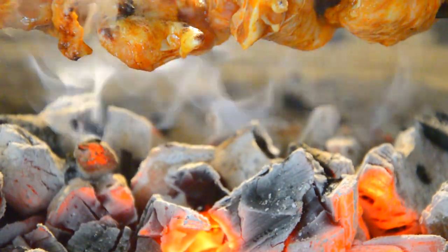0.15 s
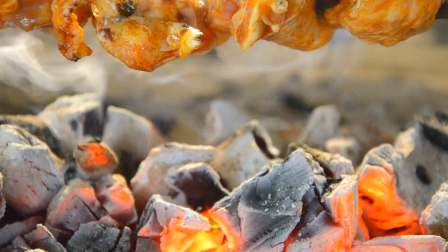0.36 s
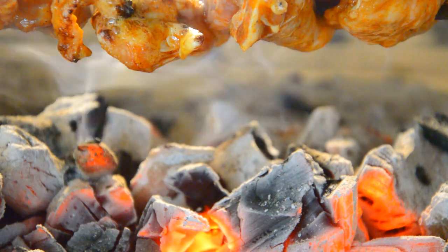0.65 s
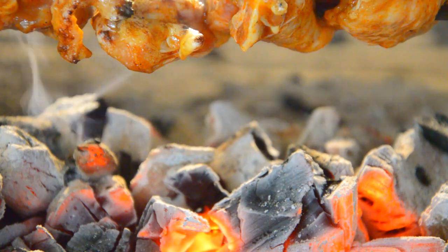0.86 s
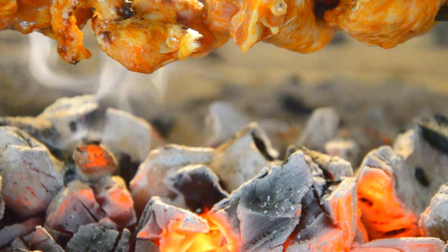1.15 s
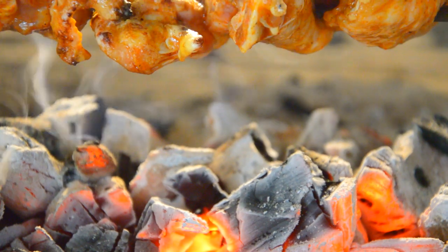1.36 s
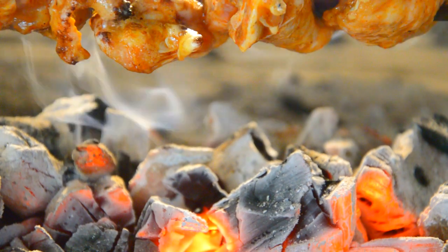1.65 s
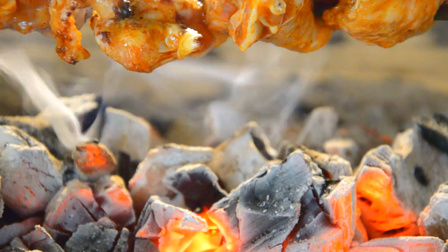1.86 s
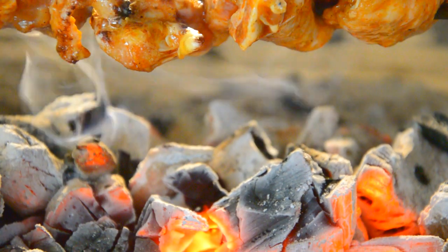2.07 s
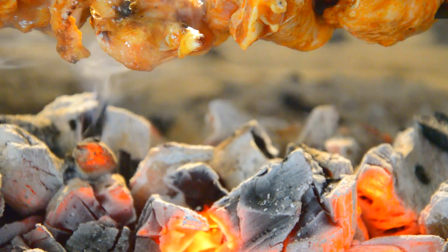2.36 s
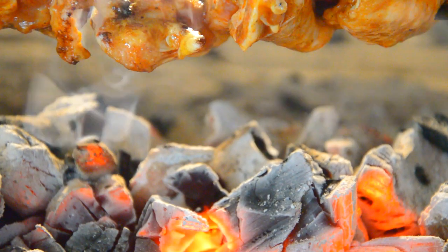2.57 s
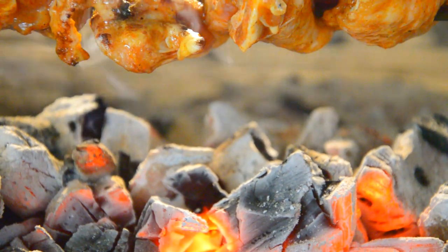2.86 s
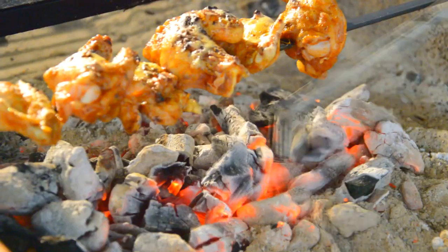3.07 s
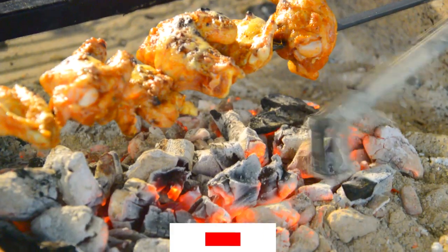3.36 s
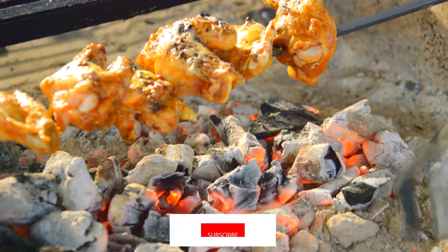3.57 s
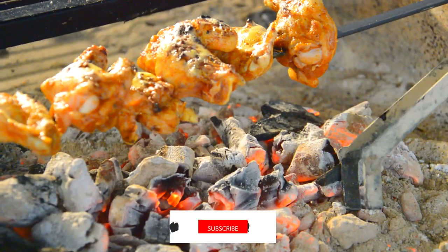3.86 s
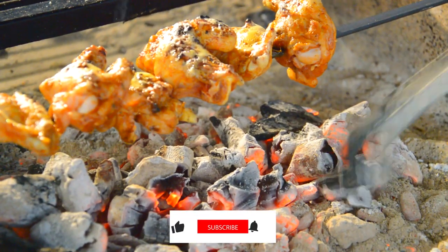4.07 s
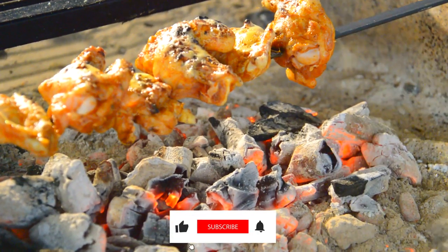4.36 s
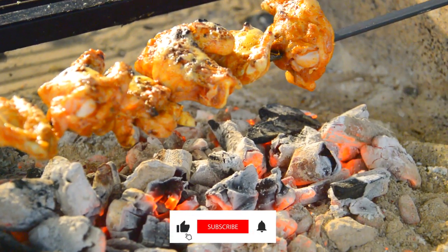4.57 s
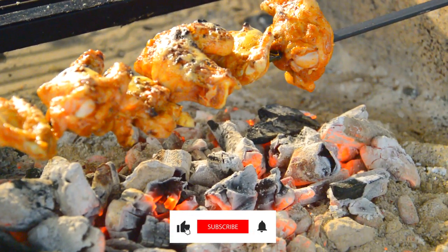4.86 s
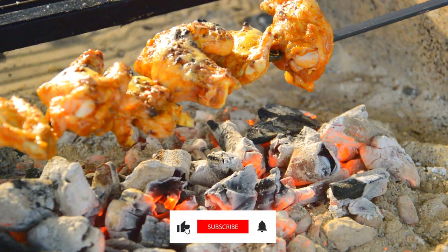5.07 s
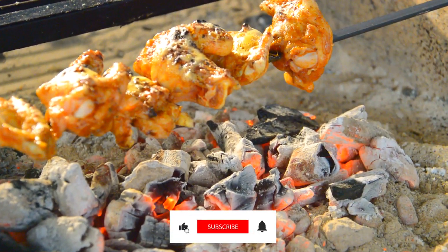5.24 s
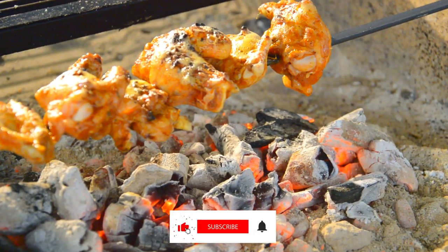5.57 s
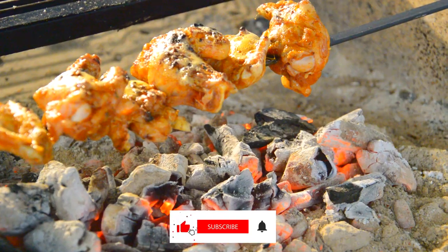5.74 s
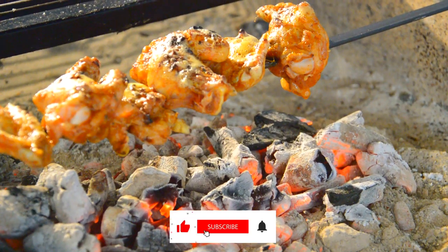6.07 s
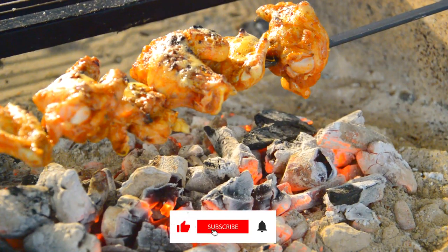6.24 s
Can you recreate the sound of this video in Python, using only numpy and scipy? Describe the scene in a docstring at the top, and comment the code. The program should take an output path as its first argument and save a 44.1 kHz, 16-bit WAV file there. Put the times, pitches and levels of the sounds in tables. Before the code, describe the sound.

Very close to an open charcoal pit outdoors, dripping fat fizzes and hisses under constant sharp spits, hollow pops and a bubbling gurgle. Soft thumps come early on. At about five seconds the steady sizzle suddenly vanishes, leaving bare snaps, then fades back in drier and more crackly, with wind rumbling on the microphone.

```python
"""At an open pit, fat and juice drip onto glowing charcoal and sizzle, close to the microphone.
Clicks with noise tails, rung at set pitches, make the sharp spits, hollow pops, thumps, dry ticks and gurgle.
The fizz is a dense crowd of such clicks and the steam is coloured noise; two whumps are falling tones.
Faint rumble is low noise. Near the end the steady sounds drop out while spits and pops go on.
The steady sounds then fade back in, now with wind rumbling on the microphone."""
import sys
import numpy as np
from scipy import signal
from scipy.fft import rfft, irfft, next_fast_len
from scipy.io import wavfile

SR = 44100
rng = np.random.default_rng(int(sys.argv[2]) if len(sys.argv) > 2 else 0)


def bounce(signal):
    """Save signal as a 16-bit WAV file at the path given by the first command-line argument."""
    frames = np.transpose(np.atleast_2d(signal))
    limited = np.clip(frames, -1, 1)
    pcm = np.round(limited * 32767).astype(np.int16)
    wavfile.write(sys.argv[1], SR, pcm)


N = 282240   # samples, 6.4 seconds

# All levels below are before the fade of the steady sounds and before the rounding of loud peaks.
# The changing sizzle up to the cut. Each row: start in seconds, fizz level in dB, low gurgle level in dB,
# low gurgle pitch in Hz, high gurgle level in dB.
SIZZLE_BEFORE = [(0.0, -32, -42.5, 2060, -43), (0.25, -30, -40, 1650, -42.5),
                 (0.49, -31, -40.5, 2050, -35.5), (1.21, -31.5, -37.5, 2230, -44),
                 (1.51, -30, -41.5, 1800, -46), (1.66, -29, -37.5, 2190, -34),
                 (1.92, -29.5, -41.5, 1450, -36), (2.39, -35, -45.5, 2370, -41.5),
                 (2.62, -33.5, -37.5, 2250, -41), (2.74, -31.5, -37, 2080, -46),
                 (2.85, -33.5, -44, 1400, -48), (2.96, -31.5, -44, 1400, -47),
                 (3.05, -33, -38.5, 1420, -37), (3.16, -30, -47, 1620, -40), (3.31, -31, -42, 1840, -36.5),
                 (3.45, -31, -47, 2040, -45), (3.57, -31.5, -42, 2190, -45),
                 (3.8, -30.5, -42.5, 2170, -44.5), (3.98, -32, -47.5, 2270, -51),
                 (4.17, -32, -42.5, 1680, -45.5), (4.39, -31.5, -44.5, 1430, -41),
                 (4.45, -29.5, -40.5, 1930, -42.5), (4.82, -32.5, -52, 2180, -48),
                 (5.02, -32.5, -53, 2300, -50)]
# The steady sizzle after the cut. In order: fizz level in dB, low gurgle level in dB,
# low gurgle pitch in Hz, high gurgle level in dB.
SIZZLE_LATER = (-37.5, -43.5, 1917, -44)
# Loud spits of bursting bubbles. Each row: start in seconds, peak level in dB, centre pitch in Hz,
# hissing tail in dB against the crack.
SPIT_EVENTS = [(0.1281, -14.0, 13500.0, -16.0), (0.1799, -9.5, 10100.0, 1.0),
               (0.2117, -10.0, 6200.0, -17.0), (0.2874, -17.0, 5200, -11), (0.382, -13.0, 7300.0, -15.0),
               (0.4723, -10.0, 14500.0, -25.0), (0.4819, -10.5, 10600.0, -19.0),
               (0.5292, -6.0, 9100.0, -18.0), (0.5411, -3.5, 9400.0, -25.0),
               (0.5776, -11.0, 12600.0, -16.0), (0.6759, -4.0, 6900.0, -23.0), (0.7422, -17.5, 4500, -14),
               (0.8002, -13.5, 7000, -12), (0.8045, -9.0, 7800.0, -13.0), (0.8218, -9.5, 7300.0, -2.0),
               (0.8498, -6.5, 4700.0, -20.0), (0.8754, -10.5, 7300.0, -15.0),
               (0.8958, -8.5, 10000.0, -26.0), (0.9912, -13.5, 6300.0, -8.0),
               (1.0452, -12.5, 7100.0, -19.0), (1.059, -11.5, 9400.0, -7.0), (1.1265, -12.5, 11000.0, -8.0),
               (1.2174, -7.5, 5100.0, -25.0), (1.2233, -13.5, 5700.0, -3.0), (1.247, -9.5, 13200.0, -30.0),
               (1.2602, -10.5, 7900.0, -27.0), (1.2919, -7.0, 9300.0, -13.0), (1.3132, -13.5, 4600.0, -8.0),
               (1.3378, -9.0, 9000.0, -9.0), (1.5056, -11.5, 10200.0, -18.0), (1.584, -12.0, 6900.0, -25.0),
               (1.605, -12.5, 6800.0, -1.0), (1.6493, -12.5, 5100.0, -8.0), (1.7381, -10.0, 9200.0, -15.0),
               (1.8462, -11.5, 8400.0, -17.0), (1.8578, -11.0, 6800.0, -9.0),
               (2.0491, -11.5, 9000.0, -11.0), (2.136, -7.5, 8200.0, -21.0), (2.1796, -12.0, 8800.0, -4.0),
               (2.345, -13.0, 12300.0, -16.0), (2.3862, -9.0, 11800.0, -18.0),
               (2.3901, -10.5, 7300.0, -8.0), (2.4563, -7.0, 8000.0, -22.0), (2.4863, -9.5, 13100.0, -27.0),
               (2.5445, -12.5, 8900.0, -12.0), (2.5908, -13.0, 4500.0, -4.0),
               (2.6164, -11.5, 6200.0, -11.0), (2.6585, -12.0, 9200.0, -7.0), (2.7012, -13.0, 6500.0, -9.0),
               (2.7443, -6.5, 8600.0, -26.0), (2.9786, -11.0, 8000.0, -19.0),
               (3.1897, -10.0, 10300.0, -3.0), (3.1966, -5.5, 8900.0, -19.0), (3.287, -9.5, 9200.0, -7.0),
               (3.3528, -9.5, 5400.0, -8.0), (3.373, -11.0, 9700.0, -17.0), (3.3861, -11.5, 12200.0, -22.0),
               (3.4048, -11.5, 8500.0, -16.0), (3.6653, -12.5, 8700.0, -19.0),
               (3.7271, -10.0, 12300.0, -17.0), (3.7337, -13.5, 9200.0, -9.0),
               (3.8121, -11.0, 5900.0, -4.0), (3.8819, -11.5, 14800.0, -10.0),
               (3.9267, -13.0, 7700.0, -4.0), (3.9518, -7.5, 4500.0, -7.0), (4.0238, -14.0, 12100.0, 0.0),
               (4.028, -7.5, 7300.0, -20.0), (4.0953, -11.0, 5300.0, -3.0), (4.1036, -12.0, 5300.0, -1.0),
               (4.1188, -11.0, 7800, -26), (4.1214, -4.0, 9000.0, -19.0), (4.1348, -13.0, 7300.0, -17.0),
               (4.2284, -10.0, 5800.0, -16.0), (4.2312, -12.0, 4800.0, -2.0), (4.2812, -14.5, 9200.0, 1.0),
               (4.2889, -13.5, 12400.0, -14.0), (4.2942, -11.0, 5300.0, -11.0),
               (4.4105, -11.0, 7500.0, -16.0), (4.5015, -12.0, 14800.0, -9.0),
               (4.5391, -10.5, 7300.0, -14.0), (4.5577, -12.5, 14400.0, -6.0),
               (4.5706, -10.0, 8500.0, -29.0), (4.5803, -9.0, 8900.0, -21.0), (4.6756, -7.5, 7500.0, -12.0),
               (4.7535, -9.5, 7500.0, -10.0), (4.7633, -12.0, 12200.0, -10.0),
               (4.8781, -11.5, 14600.0, -26.0), (4.9087, -13.0, 8300.0, -12.0), (4.9581, -14.5, 7900, -4),
               (5.1217, -14.0, 9800.0, -24.0), (5.1906, -10.0, 9600.0, -15.0),
               (5.2029, -17.5, 6400.0, -24.0), (5.2292, -16.5, 9700.0, -25.0),
               (5.3476, -13.0, 10500.0, -19.0), (5.3995, -12.5, 9700.0, -7.0),
               (5.4064, -9.5, 10700.0, -26.0), (5.4159, -7.5, 10000.0, -26.0),
               (5.455, -14.0, 6300.0, -20.0), (5.4988, -14.0, 4500.0, -22.0), (5.5544, -5.5, 9500.0, -29.0),
               (5.5642, -15.0, 7500, -16), (5.5858, -12.5, 10100.0, -12.0), (5.6324, -13.0, 7400.0, -11.0),
               (5.6734, -6.5, 4300.0, -16.0), (5.6987, -8.0, 11200.0, -29.0), (5.7354, -15.5, 6400, -10),
               (5.7382, -9.5, 7300.0, -18.0), (5.7668, -14.0, 7600.0, -15.0),
               (5.7704, -11.0, 11000.0, -14.0), (5.8331, -12.5, 8000, -8), (5.8765, -8.0, 14500.0, -23.0),
               (5.8861, -6.5, 10600.0, -23.0), (5.9025, -10.5, 8100.0, -5.0), (5.923, -10.5, 9000.0, -17.0),
               (5.9454, -2.0, 9400.0, -23.0), (5.9742, -13.0, 6200.0, -7.0),
               (6.0257, -13.0, 12300.0, -18.0), (6.058, -11.5, 9300.0, -14.0), (6.07, -10.0, 12400.0, -7.0),
               (6.0802, -2.5, 9600.0, -34.0), (6.1565, -9.5, 9900.0, -7.0), (6.2276, -12.0, 6700.0, -24.0),
               (6.254, -8.5, 6600.0, -26.0), (6.3, -9.0, 9900.0, -26.0)]
# Hollow pops of large bubbles. Each row: start in seconds, peak level in dB, pitch in Hz, ringing in cycles.
POP_EVENTS = [(0.1131, -20.5, 1720.0, 2.8), (0.5411, -16.0, 2200.0, 1.5), (0.5612, -17.0, 3530.0, 1.5),
              (0.6414, -20.5, 2780.0, 8.1), (0.6758, -16.5, 1550.0, 1.5), (0.6824, -15.5, 2150.0, 1.8),
              (0.7525, -22, 3500, 1.5), (0.8054, -20.5, 3250.0, 1.5), (0.8233, -20.0, 1680.0, 1.5),
              (0.8497, -12.0, 1610.0, 1.5), (0.8564, -20.5, 1610.0, 1.5), (1.0452, -17.0, 3040.0, 1.5),
              (1.1273, -21.0, 1570.0, 1.5), (1.2173, -17.0, 3360.0, 1.5), (1.2339, -20.0, 2560.0, 1.5),
              (1.247, -19.5, 1510.0, 1.5), (1.3319, -14.5, 1720.0, 1.5), (1.3667, -19.0, 2130.0, 1.8),
              (1.3808, -16.0, 2370.0, 1.5), (1.4155, -21.0, 3600.0, 7.7), (1.6711, -20.5, 2500.0, 1.5),
              (1.7093, -20.0, 3660.0, 1.5), (1.7342, -18.5, 3570.0, 9.0), (1.7422, -17.5, 3700.0, 1.5),
              (1.8442, -22.0, 1460.0, 3.1), (2.3562, -16.5, 2450.0, 8.7), (2.362, -23, 2900, 3.0),
              (2.5534, -20.0, 3100.0, 1.5), (2.642, -20.5, 2540.0, 1.5), (3.0763, -20.5, 1640.0, 5.0),
              (3.1002, -19.0, 1460.0, 1.5), (3.2893, -20.5, 3420.0, 6.9), (3.5859, -19.0, 2560.0, 1.5),
              (3.6373, -21.0, 2690.0, 1.5), (3.6821, -17.5, 2430.0, 6.3), (3.9392, -17.0, 3450.0, 11),
              (4.142, -22, 1600, 5.0), (4.7753, -20.5, 2990.0, 1.5), (5.1904, -22, 3140, 1.5),
              (5.4064, -22.0, 1660.0, 2.5), (5.4549, -20.5, 1530.0, 1.5), (5.5543, -17.0, 1570.0, 1.5),
              (5.5639, -20.0, 2150.0, 3.3), (5.6325, -14.5, 1610.0, 2.0), (5.638, -18.0, 2070.0, 3.3),
              (5.669, -19.0, 3530.0, 5.5), (5.6733, -17.0, 3010.0, 4.9), (5.6986, -19.0, 1570.0, 2.0),
              (5.7383, -16.5, 1610.0, 2.1), (5.7704, -15.5, 3290.0, 1.7), (5.7782, -20.5, 2090.0, 3.9),
              (5.794, -20.5, 1960.0, 1.5), (5.8701, -21.0, 3040.0, 11), (5.9453, -14.0, 2260.0, 1.5),
              (6.08, -16.5, 1550.0, 1.5), (6.0867, -15.0, 2110.0, 1.5), (6.1534, -20.5, 3550.0, 9.3),
              (6.2097, -20.5, 3210.0, 1.5), (6.254, -12.0, 1590.0, 1.5)]
# Soft thumps of drops flashing on the coals. Each row: start in seconds, peak level in dB, pitch in Hz.
THUMP_EVENTS = [(0.403, -36, 533), (0.576, -30, 552), (0.685, -29.5, 470), (0.805, -35, 430),
                (0.872, -24, 676), (1.065, -33, 490), (1.14, -33, 428), (1.224, -28, 789),
                (1.351, -24.5, 550), (1.711, -31.5, 600), (1.952, -34.5, 510), (2.294, -38, 500),
                (2.619, -34, 500)]
# Two flare-ups that push out a soft whump. Each row: start in seconds, starting level in dB,
# start pitch in Hz, end pitch in Hz.
WHUMP_EVENTS = [(2.475, -48.5, 460, 85), (2.786, -46, 510, 90.5)]
# Low noise in still air up to the cut. Each row: start in seconds, rumble level in dB,
# level of the deepest air movement in dB.
STILL_LEVELS = [(0.0, -57, -65), (1.34, -62, -70), (1.89, -55, -58), (2.38, -63, -82), (3.5, -63.5, -98),
                (5.02, -64, -90)]
# Wind rising after the cut. Each row: start in seconds, rumble level in dB,
# level of the deepest air movement in dB.
WIND_LEVELS = [(5.03, -53, -48), (5.6, -50.5, -47.5), (6.4, -45, -44)]

# Colour of the fizz and steam. Each row: frequency in Hz, relative strength in dB per Hz.
FIZZ_COLOUR = [(2650, -32.5), (4500, -6), (8960, 2.5), (11100, -3), (12300, -0.5), (15400, 2),
               (16000, -24.5)]
# Colour of the dry ticks. Each row: frequency in Hz, relative strength in dB per Hz.
TICK_COLOUR = [(300, -18), (700, -8.5), (1500, 2), (4000, -0.5), (9000, 0), (16000, 6)]
# Colour of the low gurgle. Each row: frequency in Hz, relative strength in dB per Hz.
GURGLE_COLOUR = [(150, -13), (300, -1.5), (540, 1.5), (870, 0), (1430, -0.5), (2800, -5), (5000, -31.5)]
# Colour of the rumble before the cut. Each row: frequency in Hz, relative strength in dB per Hz.
STILL_COLOUR = [(45, -15), (98, 5.5), (160, -1), (300, -8), (500, -17.5), (900, -49)]
# Colour of the wind rumble after the cut. Each row: frequency in Hz, relative strength in dB per Hz.
WIND_COLOUR = [(32, -32), (55, -0.5), (92, -9.5), (140, -10.5), (210, -22.5), (300, -26.5), (390, -23.5),
               (660, -120)]
# Colour of the deepest air movement. Each row: frequency in Hz, relative strength in dB per Hz.
DEEP_COLOUR = [(10, 3.5), (20, -0.5), (50, 3.5), (75, -5), (150, -56)]

CUT_S = 5.022
FADE_IN_S, FADE_CURVE, SILENCE_DB = 0.61, 0.78, -41   # the return: length, power of the ramp, lowest gain
STEAM_DB, STEAM_AFTER_DB = -7, -3   # steam against the fizz, before and after the cut
TICKS_DB, TICKS_AFTER_DB = -7, 6   # dry ticks against the fizz, before and after the cut
HIGH_GURGLE_HZ = 3625
ROUNDING_HEIGHT = 2.0   # loud peaks are rounded towards this height
CUTOFF_HZ = 16300   # from here up the sound is at least 80 dB down


def sizzle():
    """Crowds of small bubbles fizz and tick, steam hisses, and two swarms of bigger bubbles gurgle lower."""
    fizz_db, low_db, low_hz, high_db = map(after_cut, in_time([SIZZLE_BEFORE]), SIZZLE_LATER)
    fizz = bursting(np.geomspace(4000, 15000, num=5), per_s=560, spread_db=4.2, clump_db=2.8,
                    tail_s=.0004, tail_db=-20, cycles=2.2, broad=.3, favoured_hz=8000, octaves=4.0)
    ticks = bursting(np.geomspace(2000, 12000, num=5), per_s=380, spread_db=4.0, clump_db=1.5,
                     tail_s=.0002, tail_db=-22, cycles=1.6, broad=.45, favoured_hz=6000, octaves=6.0)
    low = bursting(np.geomspace(1000, 2900, num=8), per_s=750, spread_db=3.4, clump_db=1.8,
                   tail_s=.0004, tail_db=-18, cycles=3.6, broad=.09, favoured_hz=low_hz, octaves=.3)
    high = bursting([3100, HIGH_GURGLE_HZ, 4000], per_s=500, spread_db=3.5, clump_db=2.4,
                    tail_s=.0005, tail_db=-14, cycles=6.0, broad=.02, favoured_hz=HIGH_GURGLE_HZ, octaves=.4)
    steam = colour(rng.standard_normal(N), FIZZ_COLOUR) * from_db(after_cut(STEAM_DB, STEAM_AFTER_DB))
    tick_gain = from_db(after_cut(TICKS_DB, TICKS_AFTER_DB))
    bright = colour(fizz, FIZZ_COLOUR) + steam + tick_gain * colour(ticks, TICK_COLOUR)
    gurgle = from_db(low_db) * colour(low, GURGLE_COLOUR) + from_db(high_db) * rms_one(high)
    return from_db(fizz_db) * bright + gurgle


def bursting(pitches_hz, per_s, spread_db, clump_db, tail_s, tail_db, cycles, broad, favoured_hz, octaves):
    """Bubbles burst at random in clumps; each click rings briefly at one of the pitches."""
    strengths = from_db(spread_db * np.minimum(rng.exponential(1, N), 2.8)) * rng.choice([-1, 1], N)
    born = rng.random(N) < per_s * from_db(clump_db * drift(50)) / SR
    dealt = rng.integers(0, len(pitches_hz), N)   # which pitch each bubble gets
    out = 0
    for k, hz in enumerate(pitches_hz):
        clicks = strengths * born * (dealt == k) + 1e-9
        burst = puff(clicks, rng.standard_normal(N), tail_s, tail_db, slow_db=-24.0)
        # Pitches near the favoured one ring loudest.
        share = np.exp(-(np.log2(hz / favoured_hz) / octaves) ** 2)
        rung = resonance(burst, hz, hz / cycles) * np.sqrt(pitches_hz[-1] / hz)
        out = out + broad * burst + share * rung
    return out


def spits():
    """Bursting bubbles crack brightly, with hissing tails and little in the lows."""
    edge = signal.butter(3, [3000, 16000], "band", fs=SR, output="sos")
    rows = [(*row, 2.2) for row in SPIT_EVENTS]
    return burst_events(rows, tail_s=.0007, broad=.8, edge=edge)


def hollow_pops():
    """Large bubbles ring for a few cycles as they burst."""
    edge = signal.butter(2, [900, 5000], "band", fs=SR, output="sos")
    rows = [(s, peak_db, hz, -24.0, cycles) for s, peak_db, hz, cycles in POP_EVENTS]
    return burst_events(rows, tail_s=.0004, broad=.05, edge=edge)


def thumps():
    """Drops flashing on the coals give lower, rounder bursts with the treble taken off."""
    edge = signal.butter(2, 1300, fs=SR, output="sos")
    rows = [(*row, -36.0, 1.3) for row in THUMP_EVENTS]
    return burst_events(rows, tail_s=.002, broad=.05, edge=edge)


def burst_events(rows, tail_s, broad, edge):
    """Ring a click and its puff at each row's pitch, add some of the plain burst, then filter it."""
    length = 1500
    out = np.zeros(N + 1600)
    click = np.arange(length) == 0
    noise = rng.standard_normal((len(rows), length))
    for (s, peak_db, hz, tail_db, cycles), hiss in zip(rows, noise):
        # The sign of the first noise value flips the click at random.
        burst = puff(click * np.sign(hiss[0]), hiss, tail_s, tail_db, slow_db=-22.0)
        rung = resonance(burst, hz, hz / cycles)
        sound = signal.sosfilt(edge, rung / abs(rung).max() + broad * burst)
        at = round(s * SR)
        out[at:at + length] += from_db(peak_db) * sound / abs(sound).max()
    return out[:N]


def puff(clicks, noise, tail_s, tail_db, slow_db):
    """Steam escapes after each click: a quick hiss that swells and dies, and a slower faint one."""
    r = np.exp(-1 / (tail_s * SR))
    slow_r = np.exp(-1 / (68.0 * tail_s * SR))
    # The factor e * (1 - r) brings the top of the swell to about 1.
    quick = signal.lfilter([from_db(tail_db) * np.e * (1 - r)], [1, -2 * r, r * r], abs(clicks))
    slow = signal.lfilter([from_db(tail_db + slow_db)], [1, -slow_r], abs(clicks))
    return clicks + (quick + slow) * noise


def whumps(fall_s=0.012, fade_s=0.039):
    """A pocket of gas swells: its tone slides down as it dies away."""
    length = 4000
    out, t = np.zeros(N), np.arange(length) / SR
    for s, peak_db, start_hz, end_hz in WHUMP_EVENTS:
        hz = end_hz + (start_hz - end_hz) * np.exp(-t / fall_s)
        tone = np.sin(2 * np.pi * np.cumsum(hz) / SR)
        at = round(s * SR)
        out[at:at + length] += from_db(peak_db) * np.exp(-t / fade_s) * tone
    return out


def rumble():
    """Soft low noise in still air, lumpy wind pressure after the cut, and a deep layer under both."""
    level_db, deep_db = in_time([STILL_LEVELS, WIND_LEVELS])
    still = colour(rng.standard_normal(N), STILL_COLOUR) * from_db(3.2 * drift(12))
    wind = colour(rng.standard_normal(N), WIND_COLOUR) * from_db(1.8 * drift(8))
    deep = colour(rng.standard_normal(N), DEEP_COLOUR)
    return from_db(level_db) * after_cut(still, wind) + from_db(deep_db) * deep


def fade():
    """Gain of the steady sounds: an even level, a sudden drop, then a ramp back up to 1."""
    ramp = np.clip((np.arange(N) / SR - CUT_S) / FADE_IN_S, 0, 1) ** FADE_CURVE
    return after_cut(0.77, np.maximum(ramp, from_db(SILENCE_DB)))


def after_cut(before, after):
    """Use one value up to the cut and another from then on."""
    return np.where(np.arange(N) < CUT_S * SR, before, after)


def in_time(tables):
    """Join the rows of consecutive tables by straight lines, giving each column one value a sample."""
    s, *columns = np.transpose(np.vstack(tables))
    return [np.interp(np.arange(N) / SR, s, column) for column in columns]


def colour(x, spectrum):
    """Filter a sound by the spectrum, with minimum phase so that nothing rings early; rms 1."""
    size = next_fast_len(N + 8192)
    hz = np.maximum(np.arange(size // 2 + 1) * SR / size, 1)
    points_hz, points_db = np.transpose(spectrum)
    gain = from_db(np.interp(np.log(hz), np.log(points_hz), points_db))
    # Folding the cepstrum (the spectrum of the log gain) forward in time gives minimum phase.
    cepstrum = irfft(np.log(gain), size)
    cepstrum[1:size // 2] *= 2
    cepstrum[size // 2 + 1:] = 0
    response = np.exp(rfft(cepstrum))
    return rms_one(irfft(rfft(x, size) * response, size)[:N])


def drift(rate_hz):
    """Slow random wandering with spread 1: noise through two equal low-pass steps."""
    # Made at a tenth of the sample rate; the first 4000 values let the filter settle.
    r = np.exp(-20 * np.pi * rate_hz / SR)
    noise = rng.standard_normal(N // 10 + 4002)
    slow = signal.lfilter([1], [1, -2 * r, r * r], noise)[4000:]
    return np.interp(np.arange(N) / 10, np.arange(len(slow)), rms_one(slow - slow.mean()))


def resonance(x, hz, width_hz):
    """Ring at one pitch with a two-pole filter of gain about 1 at its top; a narrower width rings longer."""
    r = np.exp(-np.pi * width_hz / SR)
    feed = np.array([1, 0, -1]) * (1 - r * r) / 2
    return signal.lfilter(feed, [1, -2 * r * np.cos(2 * np.pi * hz / SR), r * r], x)


def from_db(db):
    """Turn dB into a plain gain."""
    return 10 ** (np.asarray(db) / 20)


def rms_one(x):
    """Scale a sound to an rms (average strength) of 1."""
    return x / np.sqrt(np.mean(x ** 2) + 1e-20)


def scene():
    """Mix all sources into one channel; only the sizzle and rumble follow the fade."""
    steady = fade() * (sizzle() + rumble())
    return (steady + spits() + hollow_pops() + thumps() + whumps())[None]


def record(dry):
    """Round the loudest peaks a little and cut the top steeply."""
    rounded = ROUNDING_HEIGHT * np.tanh(dry / ROUNDING_HEIGHT)
    top_cut = signal.cheby2(18, 80, CUTOFF_HZ, fs=SR, output="sos")
    return signal.sosfilt(top_cut, rounded)


dry = scene()
out = record(dry)
bounce(out)
```